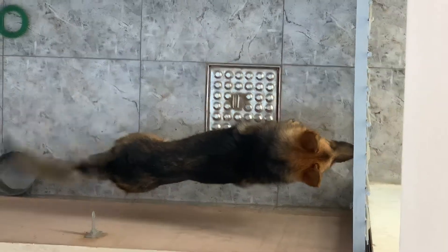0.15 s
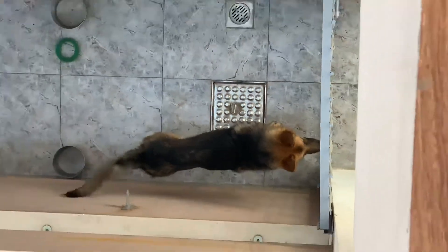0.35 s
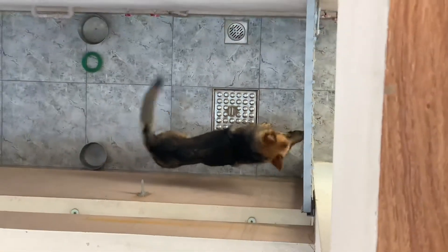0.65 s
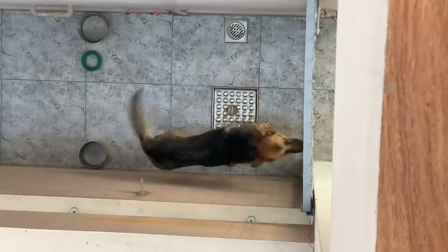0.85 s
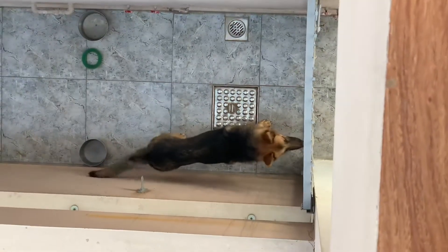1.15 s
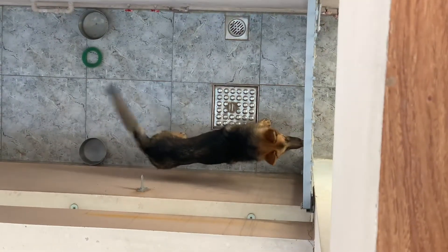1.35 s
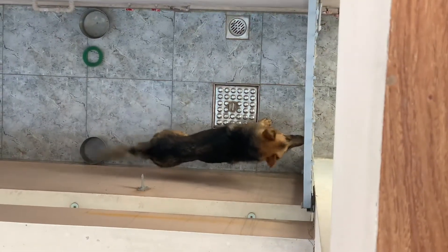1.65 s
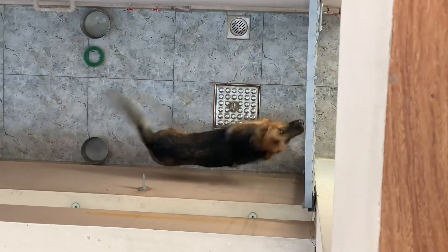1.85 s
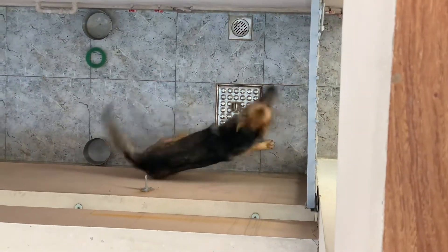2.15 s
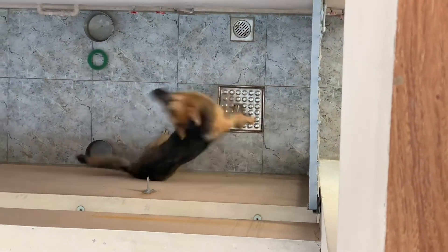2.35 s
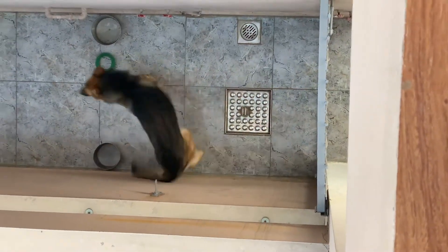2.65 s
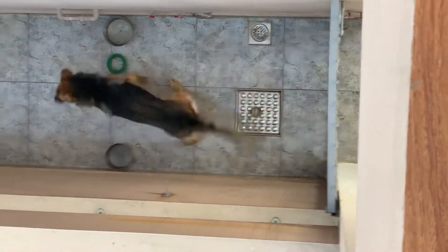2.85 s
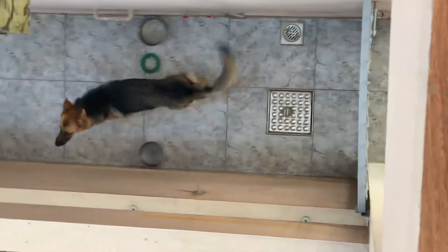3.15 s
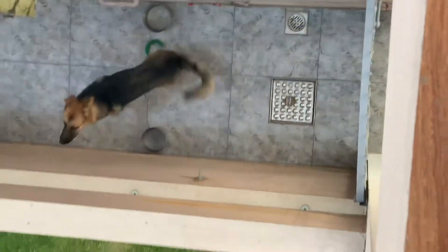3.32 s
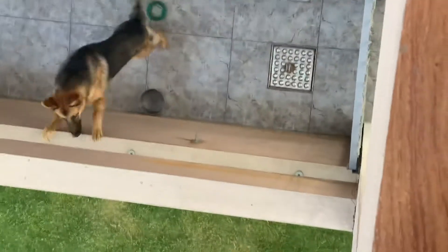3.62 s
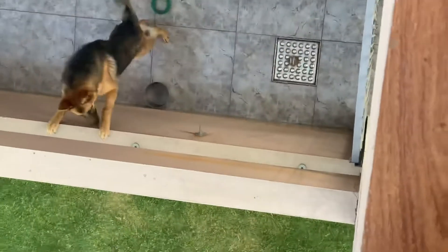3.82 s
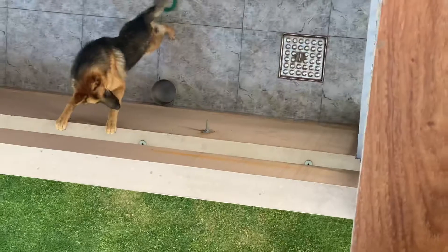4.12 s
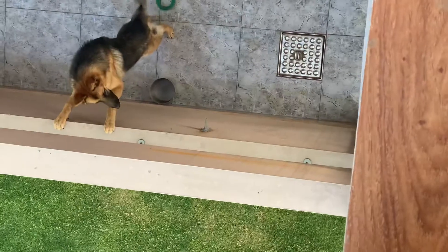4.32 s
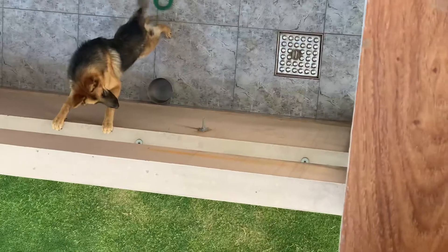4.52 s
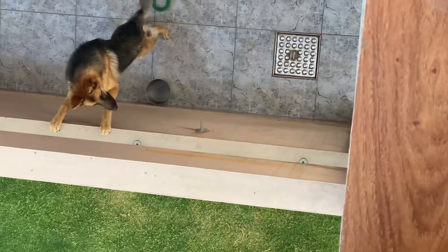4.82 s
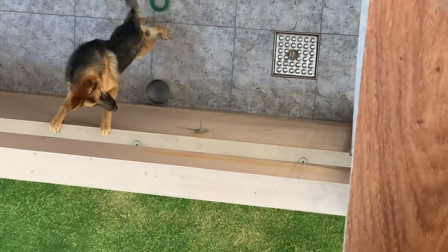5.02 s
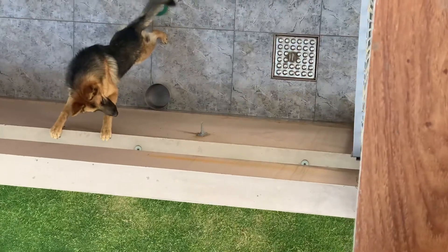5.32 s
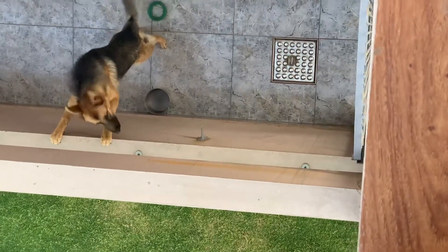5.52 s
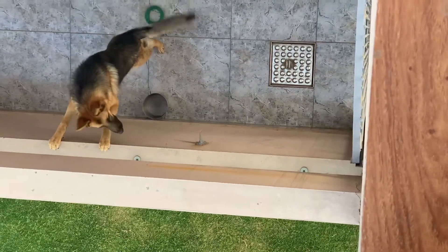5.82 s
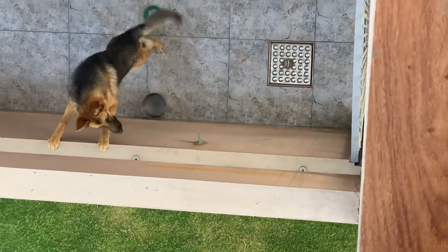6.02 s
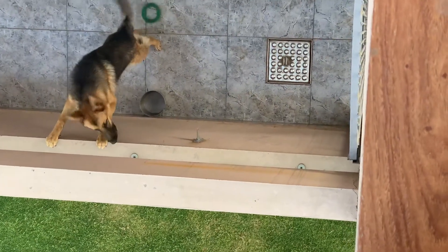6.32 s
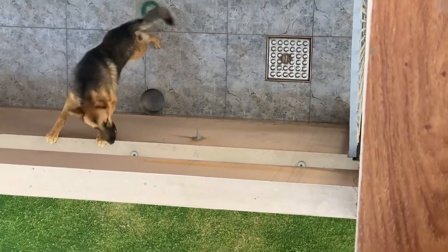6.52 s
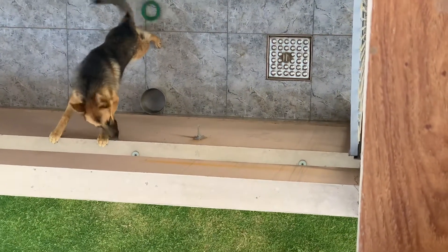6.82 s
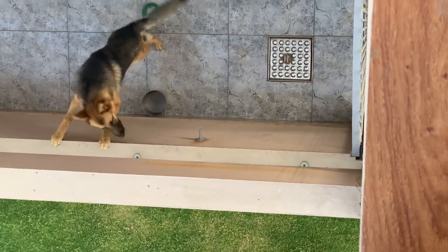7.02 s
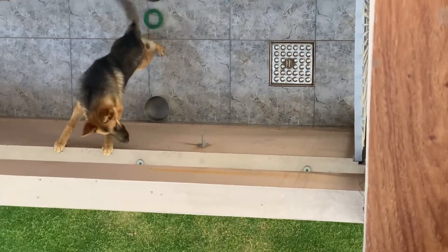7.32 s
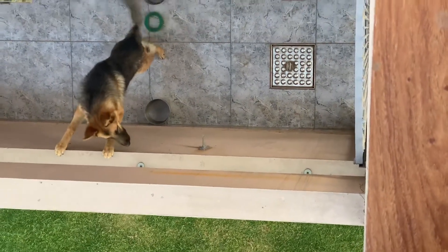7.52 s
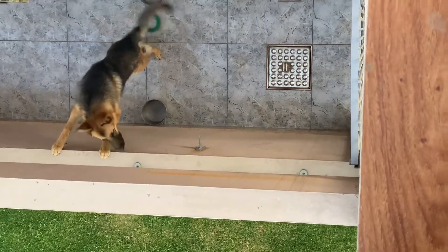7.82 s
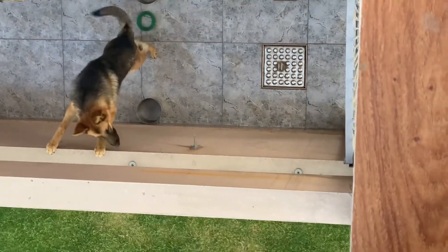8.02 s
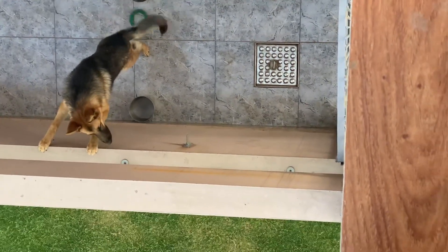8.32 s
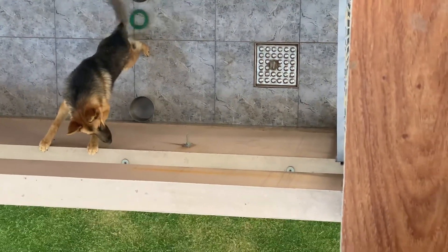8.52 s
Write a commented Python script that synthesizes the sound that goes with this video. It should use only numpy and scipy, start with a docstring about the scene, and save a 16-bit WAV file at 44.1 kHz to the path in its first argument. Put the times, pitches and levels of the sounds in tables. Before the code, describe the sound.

Sharp, rough single barks from a big dog burst over very quiet distant town rumble. Each starts as a muffled closed-mouth tone and snaps open into a hoarse or yelping shout with hiss at the teeth. After four there is a pause with tiny claw ticks and a soft growl; five more follow, including a fast trio. Stereo microphone above, dog nearly centred, short bright balcony reflections and longer echoes from house fronts.

```python
"""Large dog on a tiled balcony

A large dog barks nine times, heard from a window above through two microphone ports; it whines and growls softly.
Each bark starts as a closed-mouth tone from the vocal folds, then the jaws open and free higher resonances and a hiss;
the voice turns hoarse or breaks into a clear yelp. The balcony walls answer at once in decaying noise tails, houses
further off return narrow-band echoes for a second; claws and paws are filtered noise, and so is the faint town hum."""
import sys
import numpy as np
from scipy import signal
from scipy.fft import rfft, irfft, next_fast_len
from scipy.io import wavfile
from scipy.ndimage import uniform_filter1d, map_coordinates

SR = 44100
rng = np.random.default_rng(int(sys.argv[2]) if len(sys.argv) > 2 else 0)


def put_to_file(sound):
    """Save the sound as 16-bit audio at rate SR, in the file named by the first command-line argument."""
    columns = np.atleast_2d(sound).T  # one column per channel
    safe = np.clip(columns, -1, 1)
    whole_steps = np.round(safe * 32767)
    wavfile.write(sys.argv[1], SR, whole_steps.astype(np.int16))


N = 381906

# The barks and one short second burst: start_s, length_s, attack_s, jaws_open_after_s, clear_for_the_last_s,
# closed_mouth_pitch_hz, open_mouth_pitch_hz, hoarseness (0-1), clear_part_roughness (0-1),
# clear_part_odd_overtones_db, chest_tone_db, chest_drop_once_jaws_open_db, open_mouth_db,
# bared_teeth_edge_db, edge_lag_behind_jaws_s, edge_fade_over_bark_db,
# late_surge_db (negative: the voice falters), release_db_per_s
BARK_TABLE = [ (.726, 0.083, 0.027, 0.03493, 0.005, 505.3, 585, .7, .7, 0, -9.5, 7.5, -17, -21, .003, 1, 5, 260),
              (1.775, 0.089, 0.032, .049, 0.0057, 505.9, 512, 0.6, .68, -3, -6.5, 12, -15.5, -22, 0.0059, 0.5, 3.5, 350),
              (2.065, .12, 0.037, .038, .088, 399.9, 571.6, 1, .09, -8, -10.5, 15.5, -12, -19.5, 0.014, 6, -18.5, 1100),
              (2.621, 0.1, 0.068, 0.038, .063, 762.4, 1168, .8, .02, -1.5, -30, 1.7, -9, -17, 0.0065, 8.5, -10, 1300),
              (5.36, 0.12, 0.043, 0.055, .04, 364.9, 561.6, .78, .09, -3.5, -12.5, 7.5, -20, -17.5, 0.0065, 4.5, 2.5, 650),
              (6.216, 0.12, .058, .052, 0.0011, 362.8, 530, .72, .7, 4, -5, 13, -18.5, -18.5, .001, 6.5, 4, 380),
              (6.468, .102, .055, .052, 0.0049, 354.7, 499.9, 0.69, .75, 1, -9, 8, -20.5, -23, 0.0038, 3.5, 6, 190),
              (6.762, 0.097, 0.054, .056, .048, 358, 521.2, .55, .03, -9.5, -8.5, 21, -18, -18.5, 0.036, -0.5, 5.5, 797),
              (6.879, .026, 0.015, .012, 0, 512.5, 509.3, 0.79, .7, -6.5, -17.5, 7.5, -31, -32.5, .003, 5.5, 1.5, 354),
              (7.586, .12, 0.042, 0.052, 0.035, 370.3, 534.5, .7, .15, -12, -7.5, 16, -18, -21.5, .008, 3, 4.5, 320),
              ]
# How the head is held for each bark: time_s, upper_throat_resonance_db, hiss_db, left_right_db, left_lead_ms,
# nasal_notch_hz
HEAD_POSES = [(.78, 0.5, -8, 1, .14, 3800), (1.841, -21.5, -9, 1, 0.038, 4070),
              (2.14, 6, 0.5, 0.7, -.034, 3750), (2.68, -0.5, -2.5, 0, -.12, 3650),
              (5.44, 9.5, -2, -0.5, 0.064, 2950), (6.29, 7, -2, 0.5, .026, 2920),
              (6.55, -6.5, -4.5, 0, .061, 4160), (6.84, 11.5, -5, 0.5, .01, 4250),
              (6.9, 5, -10, 0, -.031, 4200), (7.66, 4.5, -3, .5, -0.0063, 4200)]
# Paws go up on the ledge: time_s, facing_the_street (0-1)
STREET_FACING = [(0, 0), (3.2, 0), (3.8, 1), (8.66, 1)]
BREAK_S = .014  # time the voice takes to break between hoarse and clear
RELEASE_S = .05  # the voice trails on after the push ends


def amp(db):
    """Decibels to gain."""
    return 10 ** (np.asarray(db) / 20)


def unit(x):
    """Scale to rms 1."""
    return x / np.sqrt(np.mean(x ** 2) + 1e-20)


def along(points, hz):
    """Interpolate (Hz, value) points on a log frequency axis."""
    f, v = np.transpose(points)
    return np.interp(np.log(hz + 1), np.log(f + 1), v)


def curves(rows):
    """One value per sample for each column after the time."""
    s, *cols = np.transpose(rows)
    return np.array([np.interp(np.arange(N) / SR, s, c) for c in cols])


def since(start):
    """Seconds since start, per sample."""
    return np.arange(N) / SR - start


def ease(u):
    """A smooth step from 0 to 1 while u goes from -1/2 to 1/2."""
    return .5 + .5 * np.sin(np.pi * np.clip(u, -.5, .5))


def gate(t, length, open_s=0.00803, close_s=0.03):
    """1 while a call lasts, with soft ends."""
    return np.clip(np.minimum(t / open_s + .5, (length - t) / close_s + 1), 0, 1) ** 2


def swell(t, rise_s, depth_db):
    """dB of an attack that is quick at first and levels off at rise_s."""
    return -depth_db * np.clip(1 - t / rise_s, 0, None) ** 2


def wobble(rate):
    """A smooth random curve, rate knots a second."""
    return map_coordinates(rng.standard_normal(int(N * rate / SR) + 4), [np.arange(N) * rate / SR])


def filtered(x, response):
    """x times a response of frequency."""
    m = next_fast_len(N + SR // 2)
    return irfft(rfft(x, m) * response(np.fft.rfftfreq(m, 1 / SR)), m)[..., :N]


def below(hz, edge_hz, order=16):
    """Gain of a low-pass, steeper with order."""
    return 1 / (1 + (hz / edge_hz) ** order)


def ring(x, hz, sharpness):
    """x through one resonance of unit gain."""
    return signal.lfilter(*signal.iirpeak(hz, sharpness, SR), x)


def steady(x, size=700):
    """Hold the running rms near 1 but keep the fast flutter."""
    power = uniform_filter1d(uniform_filter1d(x ** 2, size), size)
    return x / np.sqrt(np.abs(power) + 1e-12)


def patchy(x, depth, width_hz, life_s):
    """Patches of random gain, about width_hz wide and life_s long; depth is (Hz, dB) points."""
    hz, t, z = signal.stft(x, SR, nperseg=256)
    at = np.array(np.meshgrid(hz / width_hz, t / life_s, indexing="ij"))
    field = map_coordinates(rng.standard_normal(at[:, -1, -1].astype(int) + 2), at)
    return signal.istft(z * amp(along(depth, hz)[:, None] * field), SR, nperseg=256)[1][..., :N]


def glide(start, length, first_hz, last_hz, first_db, last_db):
    """A soft call that slides evenly in pitch and level: where it sounds, its pitch and its gain."""
    t = since(start)
    on = gate(t, length) > 0
    u = np.clip(t[on] / length, 0, 1)
    pitch = first_hz * (last_hz / first_hz) ** u
    return on, pitch, amp(first_db + (last_db - first_db) * u) * gate(t[on], length)


def town(swell_db=1.2):
    """Distant traffic: noise with a low rumble, nearly mono but for the top treble, under a faint hiss."""
    # spectrum of the hum before levelling: frequency_hz, level_db
    town_spectrum = [(15, -28), (25, -10), (38, -17), (58, 0), (90, -7.5), (180, -14.5), (400, -25.5),
                     (800, -30.5), (1500, -34.5), (3000, -46), (8000, -56), (15000, -73)]
    # frequency_hz, left_right_likeness (0-1)
    likeness = [(60, 0.9), (180, 1), (550, 0.88), (1650, 0.93), (4970, 0.98), (15000, 0.033)]
    # traffic ahead of the slow random swell: time_s, level_db
    traffic = [(0, -48), (2, -47), (3, -50), (5.3, -48.5), (6.3, -51), (8.66, -51.5)]

    def mid_and_side(hz):
        turn = np.arccos(np.clip(along(likeness, hz), -1, 1)) / 2
        return amp(along(town_spectrum, hz)) * [np.cos(turn), np.sin(turn)]

    mid, side = filtered(rng.standard_normal((2, N)), mid_and_side)
    hum = unit(np.array([mid + side, mid - side]))
    lean = amp([[-1.3], [1.3]])  # a little louder on the right
    return amp(curves(traffic) + swell_db * wobble(3)) * hum * lean


def paws(scrape_hz=3650):
    """Pads and fur brush the tiles in small uneven scuffs of noise; dragging claws add a thin resonant scrape."""
    # paws scuffing: time_s, level_db
    pacing = [(0, -66), (.7, -68), (1.5, -63), (2.9, -65), (3.6, -66), (4.3, -72), (5.3, -74), (6.1, -77),
              (7.2, -84), (8.6, -82)]
    brush = lambda hz: (1 - below(hz, 350, order=2)) * below(hz, 2800, order=2) * below(hz, 10000, order=4)
    scuff = filtered(rng.standard_normal((2, N)), brush)
    scuff = scuff + 2 * ring(scuff, scrape_hz, 7)
    scuff = patchy(scuff, [(400, 7), (4000, 5)], width_hz=500, life_s=.06)  # each its own colour
    return amp(curves(pacing)) * unit(scuff * amp(6 * wobble(10) + 3 * wobble(90)))


def claws(level_db=-8, t60=.025):
    """Claws tick on hard surfaces: short bright cracks of decaying noise."""
    # ticks on tile and ledge, ahead of the overall trim: time_s, level_db
    ticks = [(.146, -47), (1.24, -48), (3.58, -44), (3.94, -41), (4.18, -46), (4.99, -47), (7.93, -52),
             (8.43, -51)]
    out, t = np.zeros(N + SR), np.arange(SR // 10) / SR
    for s, db in ticks:
        out[round(s * SR):][:len(t)] += amp(db + level_db - 60 * t / t60) * rng.standard_normal(len(t))
    return filtered(out[:N], lambda hz: (1 - below(hz, 600, order=2)) * below(hz, 16000, order=2))


def houses(x, spill=.06, spill_hz=2380):
    """Separate echoes off distant house fronts on alternate sides; mostly one narrow band returns from each."""
    # echoes: delay_s, band_centre_hz, band_sharpness (Q), level_db, extra_when_facing_the_street_db
    fronts = [(.09, 1120, 5, -25, -1), (.12, 570, 6, -22, -8), (.145, 1130, 5, -26, 3),
              (.2, 2240, 10, -24, 0), (.24, 1080, 5, -30, 1), (.32, 2260, 10, -27, 0),
              (.485, 1040, 9, -38, 11), (.725, 1035, 9, -44, 11), (.95, 1030, 9, -51, 10)]
    facing, echoes = curves(STREET_FACING)[0], np.zeros((2, N))
    dull = filtered(x, lambda f: spill * below(f, spill_hz, order=6))
    for k, (delay, hz, sharpness, db, facing_db) in enumerate(fronts):
        band = ring(ring(x, hz, sharpness), hz, sharpness)
        sent = (band + dull) * amp(db + facing_db * facing)
        side = amp(np.array([[1], [-1]]) * (-1) ** k)
        echoes += side * np.pad(sent, (round(delay * SR), 0))[:N]
    return echoes


def tail(decay, onset):
    """A stereo room response that builds up over onset s; each frequency dies at its own speed."""
    hz, t, z = signal.stft(rng.standard_normal((2, SR * 3 // 2)), SR, nperseg=256)
    shape = amp(-60 * t / along(decay, hz)[:, None]) * (1 - np.exp(-(t / onset) ** 2))
    shape = shape / np.linalg.norm(shape[4])  # levelled on the band near 690 Hz
    return signal.istft(z * shape, SR, nperseg=256)[1] / np.sqrt(128)


def room(x, decay, onset):
    """The dog moves between barks, so each one meets a new set of reflections."""
    out = np.zeros((2, N + 2 * SR))
    cuts = [0] + [round(start * SR) for start, *_ in BARK_TABLE[1:]] + [N]
    for a, b in zip(cuts, cuts[1:]):
        wet = signal.fftconvolve(x[None, a:b], tail(decay, onset), axes=1)
        out[:, a:a + wet.shape[1]] += wet
    return out[:, :N]


def gate_wall(x, delay=.07, sharpness=14):
    """While the dog barks through the gate, the wall beyond it rings back in a few narrow bands."""
    # time_s, muzzle_at_the_gate (0-1)
    at_gate = [(0, 1), (1.5, 1), (1.7, .4), (2.3, .3), (2.5, .01)]
    # frequency_hz, level_db
    wall_rings = [(1170, -5), (2880, -3.5)]
    sent = np.pad(x * curves(at_gate)[0], (round(delay * SR), 0))[:N]
    rings = sum(amp(db) * ring(ring(sent, hz, sharpness / 2), hz, sharpness) for hz, db in wall_rings)
    return rings + 0.31 * signal.fftconvolve(rings[None], tail([(1000, 1.0)], onset=0.016), axes=1)[:, :N]


def whistle():
    """A thin falling squeak through the nose, a sliding sine."""
    # start_s, length_s, first_pitch_hz, last_pitch_hz, first_level_db, last_level_db
    squeak = (3.221, .026, 3940, 3760, -50, -50)
    out = np.zeros(N)
    on, hz, gain = glide(*squeak)
    out[on] = gain * unit(np.sin(2 * np.pi * np.cumsum(hz) / SR))
    return out


def murmurs(overtone_db=-21, half_tone_db=-8, waver=.14, flutter_db=4, rasp=.6):
    """With the mouth shut little more than the fundamental gets out; the rougher the call, the more it shakes."""
    # falling grunts as the mouth shuts after a bark: start_s, first_pitch_hz, first_level_db
    grunt_table = [(0.837, 306, -40.5), (2.206, 413, -33.5), (6.36, 333, -27.5), (6.61, 309.4, -30),
                   (7.714, 321, -27)]
    # soft closed-mouth whines and growls: start_s, length_s, first_pitch_hz, last_pitch_hz, first_level_db,
    # last_level_db, roughness (0-1)
    whines = [(2.003, .052, 338, 376, -35, -34.5, 0.33), (3.203, 0.013, 426, 398, -25.5, -28, 0.04),
              (4.209, 0.029, 608, 565, -44, -57.5, 0.19), (4.5, 0.83, 190, 183, -50.5, -54, 1),
              (5.328, .035, 200, 340, -46, -34, 0.6), (6.187, 0.033, 290, 340, -51.5, -41.5, .5),
              (6.7, .056, 168, 298, -42.5, -32.5, 0.7), (6.918, .66, 380, 376, -40, -39, 0.38)]
    grunt_s, fall_oct_per_s, fade_db_per_s, grunt_rough = .09, 11, 169, 0.49
    out = np.zeros(N)
    drift, flutter, grain = waver * wobble(130), flutter_db * wobble(60), rasp * wobble(320)
    fall, fade_db = 2 ** (-fall_oct_per_s * grunt_s), fade_db_per_s * grunt_s
    grunts = [(s, grunt_s, hz, hz * fall, db, db - fade_db, grunt_rough) for s, hz, db in grunt_table]
    for *call, rough in grunts + whines:
        on, pitch, gain = glide(*call)
        phase = 2 * np.pi * np.cumsum(pitch * (1 + rough * drift[on])) / SR
        tone = np.sin(phase) + amp(overtone_db) * np.sin(2 * phase) + rough * amp(half_tone_db) * np.sin(phase / 2)
        out[on] += unit(tone) * gain * amp(rough * flutter[on]) * (1 + rough * grain[on])
    return out


def bark_pitch(t, length, jaws, closed_hz, open_hz):
    """Pitch creeps up behind the closed mouth, leaps as the jaws open, sags, and collapses when the push ends."""
    creep_oct_per_s, leap_s, sag_oct_per_s2, collapse_oct_per_s = 4.2, .022, 15, 13
    closed = closed_hz * 2 ** (creep_oct_per_s * np.minimum(t, jaws))
    opened = open_hz * 2 ** (-sag_oct_per_s2 * np.clip(t - jaws, 0, length - jaws) ** 2)
    collapse = 2 ** (-collapse_oct_per_s * np.maximum(t - length, 0))
    return (closed + (opened - closed) * ease((t - jaws) / leap_s)) * collapse


def bark_roughness(t, length, jaws, clear_s, hoarse, clear_rough):
    """A fairly clean start, a hoarse middle, perhaps a clear yelp, and a rough end."""
    onset_rough, collapse_rough = .2, .6  # roughness 0-1 at the two ends
    hoarse_lead_s = 0.0086  # hoarseness sets in just before the jaws open
    rough = onset_rough + (hoarse - onset_rough) * ease((t - jaws + hoarse_lead_s) / BREAK_S)
    if clear_s > 0:
        rough = rough + (clear_rough - rough) * ease((t - length + clear_s) / BREAK_S)
    return rough + (collapse_rough - rough) * ease((t - length) / BREAK_S - .5)


def gestures():
    """Pitch, roughness, odd overtones and the gains of chest tone, open mouth and edge through all the barks."""
    # each layer swells from this far below its full level
    chest_swell_db, mouth_swell_db, edge_swell_db = 22.5, 27.5, 32.5
    mouth_lag_s, chest_yield_s = 0.014, 0.045  # mouth full this long after the jaws open; chest tone gives way
    surge_at, surge_s = .76, 0.01  # place of the surge or falter (share of the length); its 1/e half width
    pitch, rough, odd_db, gains = np.full(N, 400.), np.full(N, .5), np.zeros(N), np.zeros((3, N))
    for (start, length, attack, jaws, clear_s, closed_hz, open_hz, hoarse, clear_rough, odd,
         chest, drop, mouth, edge, lag, fade, surge, release) in BARK_TABLE:
        t = since(start)
        on = (t > -BREAK_S) & (t < length + 2 * RELEASE_S)
        t = t[on]
        pitch[on] = bark_pitch(t, length, jaws, closed_hz, open_hz)
        rough[on] = bark_roughness(t, length, jaws, clear_s, hoarse, clear_rough)
        odd_db[on] = odd * ease((t - length + clear_s) / BREAK_S)
        chest_db = chest + swell(t, attack, chest_swell_db) - drop * ease((t - jaws) / chest_yield_s)
        mouth_db = mouth + swell(t, jaws + mouth_lag_s, mouth_swell_db)
        edge_fade_db = fade * np.clip((t - jaws) / (length - jaws), 0, 1)
        edge_db = edge + swell(t, jaws + lag, edge_swell_db) - edge_fade_db
        effort_db = surge * np.exp(-((t - surge_at * length) / surge_s) ** 2)
        effort_db = effort_db - release * np.maximum(t - length, 0)
        gains[:, on] += amp(np.array([chest_db, mouth_db, edge_db]) + effort_db) * gate(t, length + RELEASE_S)
    waver = 1 + .008 * wobble(90)  # unsteadiness of the pitch
    return pitch * waver, rough, odd_db, gains


def folds(pitch, rough, odd_db, jitter=0.06, shimmer_db=4, half_tone=0.93, dispersion=.8, count=14):
    """Pulses of the vocal folds; when rough they stumble in time and size and chop the air into noise."""
    tremor_rad = .035  # scatter of the pulses within their cycle; it smears the high overtones
    rough = np.clip(rough, 0, 1)
    stumble = 1 + jitter * (rough + .1) * wobble(450)
    phase = 2 * np.pi * np.cumsum(pitch * stumble) / SR + tremor_rad * wobble(900)
    # the throat delays each overtone differently, which spreads a pulse over its cycle; a yelp favours the even ones
    odd = amp(odd_db)
    pulses = unit(sum(np.cos(k * phase + dispersion * k * k) * k ** -.2 * (odd if k % 2 else 1)
                      for k in range(1, count + 1)))
    # alternate strong and weak pulses put lines halfway between the harmonics
    uneven = amp(shimmer_db * rough * wobble(400)) * (1 + half_tone * rough * np.cos(phase / 2))
    air = unit(rng.standard_normal(N) * (1 + 0.19 * np.cos(phase)))
    return (1 - .7 * rough) * pulses * uneven + 1.8 * (rough + .05) * air


def snout(source, sharpness=16):
    """A narrow resonance of the muzzle flares up and slides down as the lips pass through one shape."""
    # brief resonances: time_s, frequency_hz, level_db
    flares = [(.815, 2944, -35.5), (1.885, 3004, -46), (2.085, 7480, -48), (2.113, 3213, -37),
              (2.179, 2994, -44.5), (2.667, 3350, -50.5), (2.69, 8320, -52), (2.71, 5640, -44),
              (2.72, 2950, -42.5), (5.398, 3530, -49.5), (5.46, 3323, -41), (5.46, 6660, -47),
              (5.482, 2533, -37.5), (6.236, 2420, -49), (6.35, 3480, -44), (6.55, 4600, -44.5),
              (6.6, 3326, -51.5), (6.845, 3196, -46), (6.845, 4700, -50), (6.845, 6200, -50),
              (7.64, 2493, -38.5), (7.7, 3130, -45)]
    flare_s, slide = 0.031, .015  # 1/e half length; slide either side of the centre (share)
    out = np.zeros(N)
    for s, hz, db in flares:
        u = since(s) / flare_s
        on = np.abs(u) < 2
        early, late = [steady(ring(source[on], hz * (1 + way * slide), sharpness)) for way in (1, -1)]
        out[on] += amp(db) * np.exp(-u[on] ** 2) * (early + (late - early) * ease(u[on] / 2))
    return out


def nose(x):
    """The nasal passage swallows one band of each bark, at its own frequency."""
    notch_db, notch_width_hz = 13, 130
    hz, t, z = signal.stft(x, SR, nperseg=512)
    s, *_, notch_hz = np.transpose(HEAD_POSES)
    centre = notch_hz[np.abs(t[:, None] - s).argmin(axis=1)]  # the pose nearest in time
    notch = amp(-notch_db * np.exp(-((hz[:, None] - centre) / notch_width_hz) ** 2))
    return signal.istft(z * notch, SR, nperseg=512)[1][:N]


def barks(mouth_db=-0.5, edge_db=1.5, hiss_db=-26, hiss_noise=0.04):
    """The folds sound through the throat; opening jaws free the higher resonances and a hiss at the teeth."""
    # throat resonances: frequency_hz, gain_db
    throat = [(88, -66), (150, -30), (323, -8), (382, -3.5), (427, -6.5), (512, 4), (658, -3.5), (745, -4),
              (1300, -10), (1670, -15.5), (1820, -25), (2030, -21), (2690, -36), (3090, -39), (4200, -42.5),
              (5460, -90), (9240, -120)]
    # hiss at the teeth: frequency_hz, gain_db
    teeth = [(1710, -46.5), (2900, -38.5), (3300, -15), (4200, -13.5), (4700, -4), (5250, -7.5),
             (5900, 0.5), (6570, 2), (8420, -2), (10000, -4), (12000, -6), (13300, -6.5), (14600, -17)]
    # flapping lips and tongue shift the colour: frequency_hz, depth_db
    lips = [(400, 1), (1500, 2.5), (3000, 3.5), (9000, 3)]
    # each gape carves its own bands into the hiss: frequency_hz, depth_db
    gaps = [(3000, 3.5), (7000, 3.5), (12000, 2)]
    pitch, rough, odd_db, (chest, mouth, edge) = gestures()
    # around and below 460 Hz the folds hang slack and a rattle drowns the overtones
    slack = ease((460 - pitch) / 90)
    tone = folds(pitch, rough, odd_db)
    rattle = 1.6 * slack * amp(3 * wobble(350)) + hiss_noise
    source = patchy(tone + rattle * rng.standard_normal(N), lips, width_hz=450, life_s=.022)

    def shudder():
        """A hoarse or slack voice comes in uneven bursts."""
        return unit(amp(1.9 * np.maximum(rough, slack) * wobble(150)))

    def band(x, lo_hz, hi_hz):
        """One stretch of the throat's response."""
        return filtered(x, lambda hz: amp(along(throat, hz)) * (1 - below(hz, lo_hz)) * below(hz, hi_hz))

    upper_db, teeth_db = curves(HEAD_POSES)[:2]
    low, mid = band(tone, 150, 626), band(source, 698, 1330)
    high = band(source, 1431, 1850) + amp(upper_db) * band(source, 1850, 2260) + 0.43 * band(source, 2200, 5800)
    chest_tone = chest * steady(low) * shudder()
    open_mouth = amp(mouth_db) * mouth * steady(mid) + amp(edge_db) * edge * steady(high)
    voice = chest_tone + open_mouth * shudder()
    hiss = filtered(patchy(source, gaps, width_hz=420, life_s=.16), lambda hz: amp(along(teeth, hz)))
    hiss = amp(hiss_db + teeth_db) * (edge + 0.6 * mouth + chest) * steady(hiss)
    return nose(voice) + snout(source), nose(hiss)


def ports(x, spread=.36, wall_delay=.0015):
    """Two microphone ports hear the head at different times and levels; the wall beside them widens the image."""
    pan_db, lead_ms = curves(HEAD_POSES)[2:4]
    sides = np.array([[.5], [-.5]])
    shifts = sides * lead_ms * SR / 1000
    direct = np.array([np.interp(np.arange(N) + shift, np.arange(N), x) for shift in shifts])
    late = lambda hz: spread * (1 - below(hz, 450, order=4)) * np.exp(-2j * np.pi * hz * wall_delay)
    wall = filtered(x, late)
    return direct * amp(sides * pan_db) + np.array([wall, -wall])


def thin_middle(x):
    """A narrow band near 11.8 kHz is thin in the middle and stronger at the sides."""
    centre_hz, width_hz = 11800, 550
    share = lambda hz: np.exp(-((hz - centre_hz) / width_hz) ** 2)
    mid = filtered((x[0] + x[1]) / 2, lambda hz: 1 - share(hz))
    side = filtered((x[0] - x[1]) / 2, lambda hz: np.sqrt(2 - (1 - share(hz)) ** 2))
    return np.array([mid + side, mid - side])


def scene(balcony_db=-12, street_db=-22):
    """The dog, its reflections near and far, and the town."""
    # reverberation of the balcony: frequency_hz, decay_by_60_db_s
    balcony = [(200, .5), (1000, .41), (3000, .48), (12000, .5)]
    # reverberation of the street: frequency_hz, decay_by_60_db_s
    street = [(200, .61), (530, 1.2), (1100, 1.4), (2200, .8), (5000, .8), (12000, .35)]
    hiss_wet, treble_escape = .5, .62  # share of hiss reaching the walls; of treble lost over the ledge
    voice, hiss = barks()
    dog = voice + murmurs()
    # the short waves of the hiss scatter off tiles and ledge, which carves them into uneven bands
    scattered = room(hiss, [(1000, 0.13)], onset=0.00072)
    sent = dog + hiss_wet * hiss
    treble = filtered(sent, lambda hz: 1 - below(hz, 1800))
    sent = sent - treble_escape * curves(STREET_FACING)[0] * treble
    near = amp(balcony_db) * room(sent, balcony, onset=0.017)
    far = amp(street_db) * room(sent, street, onset=0.15) + houses(sent + near.sum(axis=0))
    direct = ports(dog + whistle())
    return direct + scattered + near + far + gate_wall(voice) + claws() + paws() + town()


def record(dry, top=0.98):
    """A narrow treble band thins in the middle, peaks are rounded off and nothing is kept above 14.6 kHz."""
    heard = thin_middle(dry)
    rounded = heard / (1 + np.abs(heard / top) ** 6) ** (1 / 6)
    return filtered(rounded, lambda hz: hz < 14600)


dry = scene()
out = record(dry)
put_to_file(out)
```